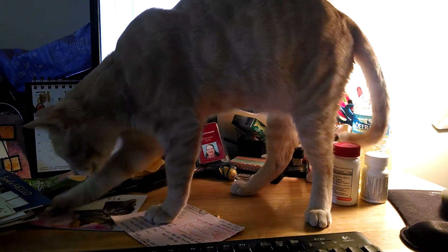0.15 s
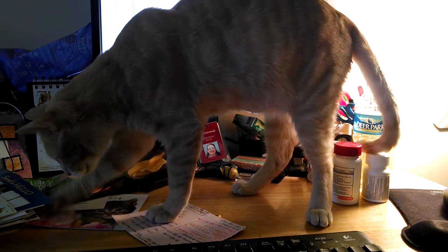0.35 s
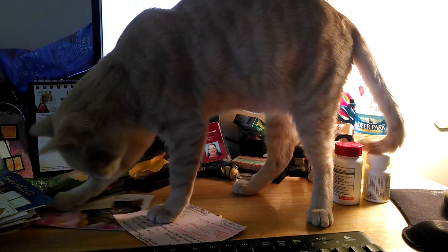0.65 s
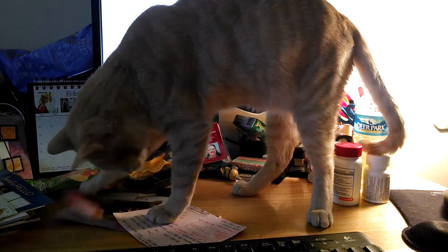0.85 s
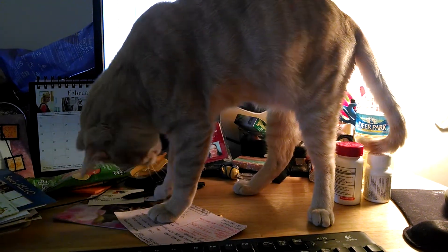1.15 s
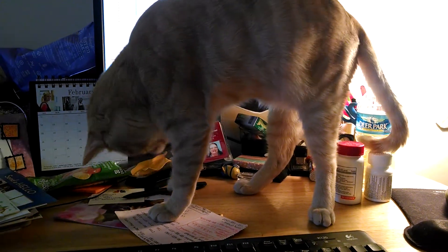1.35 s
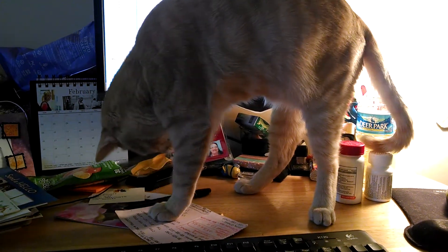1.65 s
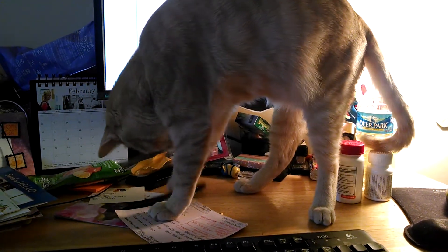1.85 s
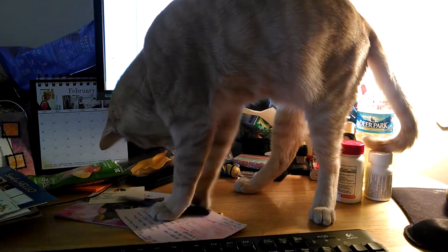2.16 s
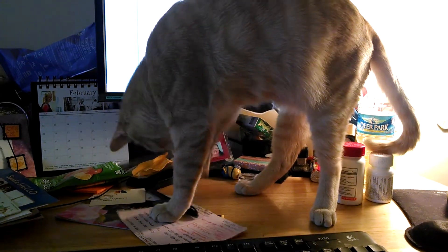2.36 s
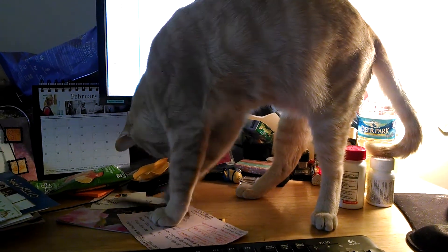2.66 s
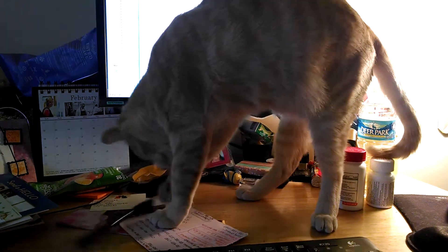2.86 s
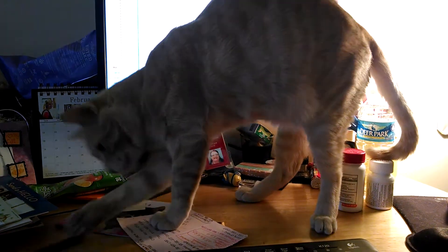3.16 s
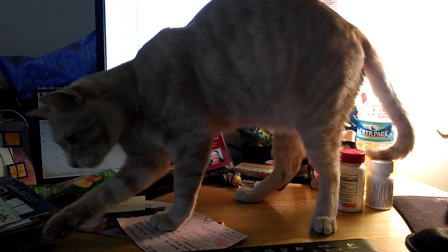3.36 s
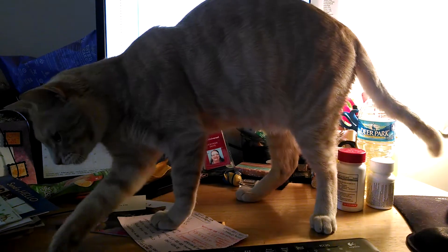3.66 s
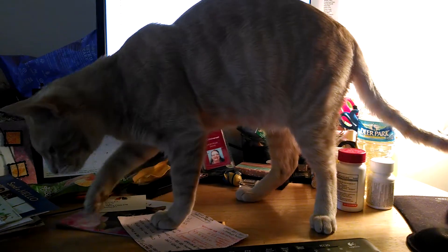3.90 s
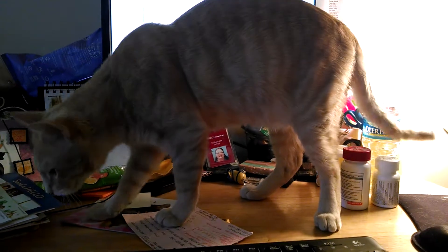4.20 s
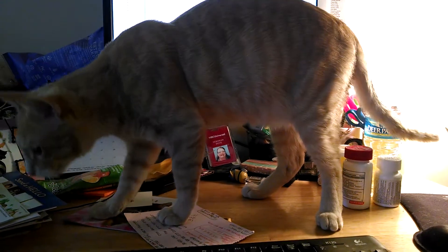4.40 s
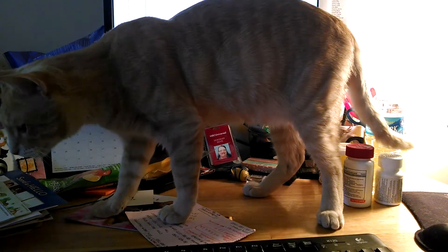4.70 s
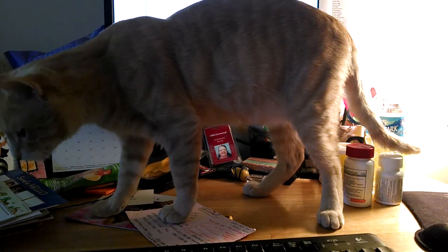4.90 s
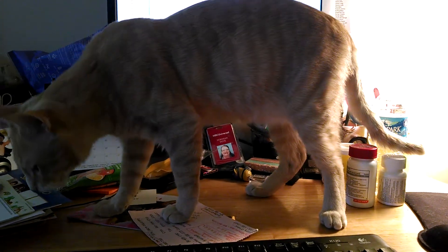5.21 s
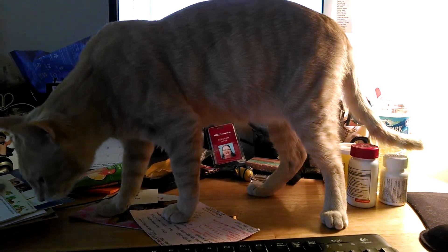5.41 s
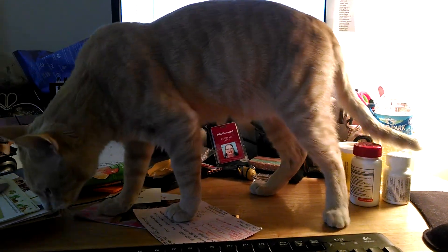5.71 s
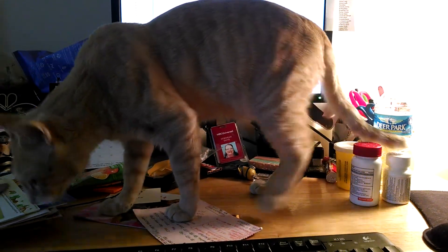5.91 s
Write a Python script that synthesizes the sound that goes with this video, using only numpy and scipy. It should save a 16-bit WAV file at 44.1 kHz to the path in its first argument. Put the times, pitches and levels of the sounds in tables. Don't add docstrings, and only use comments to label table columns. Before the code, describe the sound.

Dry, irregular paper clicks and short sliding scuffs come in clusters as a cat's paw works at sheets on a desk, with dull soft paw thumps beneath. The loudest crack comes about two and a half seconds in, briefly pushing the background down. After four seconds the paper almost stops, leaving a quiet steady fan hum, hiss and far traffic rumble in a small, lightly reverberant room, heard close in wide stereo.

```python
import sys
import numpy as np
from scipy import signal
from scipy.fft import rfft, irfft, next_fast_len
from scipy.io import wavfile
from scipy.ndimage import uniform_filter1d, map_coordinates

SR = 44100
rng = np.random.default_rng(int(sys.argv[2]) if len(sys.argv) > 2 else 0)


def undo_db(level):
    steps = np.asarray(level, float) / 20
    return 10 ** steps


def waveform_to_disk(signal):
    frames = np.transpose(np.atleast_2d(signal))
    scaled = np.clip(frames, -1, 1) * 32767
    samples = np.round(scaled).astype(np.int16)
    wavfile.write(sys.argv[1], SR, samples)


N = 266787

# start in seconds, peak in dB, desk knock in dB,
# sheet body in dB, crisp edge in dB.
SNAPS = [(0.7001, -21.5, -14, -10, -24.5), (0.9835, -14, -1.5, 5.5, -10), (0.9909, -22, -5, -9, -25),
         (1.0322, -19.5, -7, -2.5, -4.5), (1.0771, -13, -13.5, -7.5, -10.5), (1.5912, -29.5, -30, 22, -23),
         (1.7695, -28, -38, -9, -40), (2.0121, -13, -0.5, 0.5, -13.5), (2.0207, -14.5, -10, -18, -2),
         (2.0512, -24.5, -8, 3, -25), (2.124, -14, -17, -4, 34), (2.126, -21.5, 11, 19, -15),
         (2.2403, -9, -42, -13, 2), (2.4003, -16.5, -22, -12.5, -31), (2.4422, -4.5, -24, -23.5, -22.5),
         (2.45, -11.5, -22, -25, 13), (2.4737, -16.5, -11, -23, 6), (3.0008, -25.5, -18, -2.5, -21),
         (3.0898, -11.5, -24.5, -6, -33), (3.132, -23, -37, 0, -20), (3.1683, -10, 6.5, 11, 2.5),
         (3.245, -8.5, -29, -15.5, -15.5), (3.712, -9, -24.5, -7, -18.5)]
SNAP_DECAY_S, LONGER_DB_PER_DB_SOFTER = 0.0041, 0.66

# start in seconds, peak in dB, sheet body in dB, crisp edge in dB.
TICKS = [(0.5746, -31, -18, 11), (0.901, -30, -14, -14), (1.087, -24, -2, -3), (1.6178, -30, -27, -17),
         (1.922, -39, -7, -1), (2.1387, -24, -9, 24), (2.2646, -24, 2, 7), (2.2705, -21, -14, 8),
         (2.605, -34.5, -24, 2), (2.6845, -24, -18, 11), (2.6975, -26, -28, 0), (2.9222, -30.5, -17, -6),
         (4.1872, -35, -11, -9), (3.3406, -22, -3, -3), (3.3554, -32, -9, 9)]
TICK_DECAY_S, TICK_KNOCK_DB = 0.0094, -21

# start in seconds, peak in dB, sheet body in dB,
# crisp edge in dB.
CRUMPLES = [(0.2447, -44.5, -10, -2), (0.567, -37, -7, -22), (0.6152, -44.5, -7, -9),
            (0.7139, -23.5, -11, -15.5), (0.758, -33, 1, -5), (0.823, -30, 0, -26),
            (0.858, -36.5, -13, -12), (0.9088, -27, 0, -27), (0.9184, -27, -3, -17), (1.11, -32, 18, 6),
            (1.4243, -37, -27, -12), (1.5824, -24, -3, -7), (1.6564, -45, -16, -7),
            (1.7474, -38.5, 17, -24), (1.788, -39, -3, -21), (1.8134, -36, -1, -11),
            (2.0105, -23.5, -2, -22), (2.156, -30, -47, 28), (2.2563, -22.5, -28, 3),
            (2.3017, -31.5, -11, -11), (2.3453, -40, -13, -16), (2.65, -26, 2.5, 11.5),
            (2.7513, -36.5, 2, -13), (3.0457, -33.5, -13, -18), (3.1554, -25, -3, -19),
            (3.2143, -23, 0, -0.5), (5.9346, -43, -20, -24), (3.6361, -33, 25, -31), (3.7244, -29, -1, 5),
            (4.2087, -46, -3, -8)]
CRUMPLE_DECAY_S, CRUMPLE_KNOCK_DB = 0.033, -16

# start in seconds, length in seconds, sheet body in dB,
# desk over body in dB, edge over body in dB.
SKIDS = [(0.919, 0.13, -40.5, -11, -13), (1.0, 0.053, -36, -4, -6), (1.051, 0.023, -48.5, 10, -6),
         (1.086, 0.11, -36, -6.5, -16), (1.44, 0.049, -49, -8, -4), (1.597, 0.13, -46.5, -15, -6),
         (2.04, 0.062, -50, -2, -12), (2.138, 0.073, -40.5, 0, -6.5), (2.257, 0.07, -43.5, -4.5, 5.5),
         (2.346, 0.074, -49.5, -11, 0), (2.416, 0.028, -33, -9.5, -11), (2.457, 0.068, -44, 9.5, -5),
         (3.094, 0.067, -38, -11, -7), (3.181, 0.034, -34, 1, -12), (3.252, 0.08, -28, -10, -11),
         (3.351, 0.074, -37.5, -4.5, -20), (3.73, 0.14, -56.5, 11, -9)]
SKID_FALL_DB = 21

# start in seconds, length in seconds, sheet body in dB,
# mid treble over body in dB, edge over body in dB.
DRAGS = [(.675, 0.024, -55.5, 3, -2), (0.7, 0.11, -37, -11, -4.5), (0.786, 0.11, -36, -6.5, -8),
         (1.751, 0.11, -46, -2, -5.5), (1.905, 0.033, -62, 1, 3), (2.659, 0.059, -44, -2, 6),
         (2.752, 0.074, -41, -1, -7.5), (2.838, 0.039, -60, 4, 12), (3.01, 0.033, -57, 3, -12),
         (3.044, 0.039, -52.5, 7, 6), (3.218, 0.025, -34, 0.5, -26), (3.617, 0.092, -37.5, -21.5, -21),
         (3.677, 0.055, -46.5, -3, -24)]
DRAG_ENDS_DB, DRAG_FASTEST_SHARE, DRAG_DESK_DB = 19.5, 0.42, -11.5
CRACK_DB, CRACK_PER_EDGE_DB = -0.5, 0.41

# time in seconds, right microphone lag in ms, treble left-right in dB.
PAW = [(0, 0.099, -6), (.8, 0.036, -6), (.9, 0.1, -12.5), (1.1, 0.05, -3.5), (1.6, 0.0054, -4.5),
       (2, 0.004, -8.5), (2.3, 0.018, -9.5), (2.7, 0, -4.5), (2.95, 0.17, -3.5), (3.7, 0.27, -4),
       (6, 0.12, -2)]

# frequency in Hz, level in dB per Hz.
SHEET = [(100, -12), (250, -0.5), (700, -3), (1500, -0.5), (2700, 1.5), (3300, -5), (4200, -7.5),
         (5500, -6.5), (7500, -2.5), (9500, -4.5), (12000, -6.5), (15000, -9.5), (16000, -45), (17000, -85)]

# low edge in Hz, high edge in Hz.
BANDS = [(150, 850), (850, 2400), (2400, 5800), (5800, 17000)]

# centre in Hz, width in Hz, level in dB.
DESK = [(365, 140, 0), (932, 30, -6), (1484, 15, 3.5)]

# centre in Hz, width in Hz, level in dB.
PILE = [(1404, 630, -3.5), (3930, 1100, -8)]

# centre in Hz, width in Hz, depth from 0 to 1.
SOFT_DIP = (2530, 410, 0.39)

# frequency in Hz, T60 in seconds.
ROOM = [(300, 0.13), (1500, 0.22), (4000, 0.26), (10000, 0.26)]
ROOM_SOFT_HZ = 6100
MIC_SPACING_M = 0.1

# start in seconds, peak in dB, desk ring in Hz, push in dB.
THUDS = [
    (1.03, -35, 132, -13),
    (2.004, -42, 247, -5),
    (2.126, -32, 136, -20),
    (2.238, -42.5, 132, -14),
    (2.437, -34, 211, -14.5),
    (3.169, -42, 147, -10),
    (5.79, -45.5, 129, -12),
]

SHAFT_HZ = 74.88
FAN_ORDERS = [7, 9, 10, 13, 14, 21, 23, 27, 29, 31, 33, 44, 47]

# level in dB, left-right in dB.
FAN_LEVELS = [(-55.5, 4), (-76.5, 8), (-79, 8), (-97, 8), (-82, 13), (-83, -6), (-86, -10), (-109, 2),
              (-99, 14), (-88.5, -6), (-89, 20), (-83, -3), (-84, -6)]

# frequency in Hz, level in dB, left-right in dB.
MAINS = [(121.4, -62.5, -7.5), (365.4, -67, 2.5)]

# frequency in Hz, level in dB per Hz.
AIR_MID = [(50, -2), (120, 4.5), (175, -3.5), (240, 2.5), (480, -8), (700, -15), (1050, -14.5), (1400, -21),
           (2400, -23.5), (3500, -22), (5500, -28.5), (9000, -27.5), (13000, -30), (15500, -31.5)]

# frequency in Hz, level in dB per Hz.
AIR_SIDE = [(50, -3), (120, -12.5), (230, -10.5), (400, -13), (600, -18.5), (1050, -16), (1400, -19),
            (2400, -19.5), (3500, -24.5), (5500, -25.5), (9000, -28.5), (13000, -29), (15500, -33)]

# frequency in Hz, left-right in dB.
AIR_LEAN = [(60, 5), (240, 3), (950, 1), (3770, 1.5), (15000, -4.5)]

# centre in Hz, width in Hz, level in dB.
WHISTLE = (5270, 210, 2.7)
HISS_TOP_HZ, HISS_SWELL_DB = 15650, 0.8

# time in seconds, level in dB.
RUMBLE = [(0.0, -57), (0.15, -57.5), (0.32, -68.5), (1.11, -59.5), (1.38, -69), (2.12, -63.5),
          (2.42, -67.5), (3.66, -72), (4.06, -58.5), (4.85, -63), (5.11, -60.5), (5.26, -66.5), (6.05, -54)]

# start in seconds, gain drop in dB.
DUCKS = [
    (2.444, -9.5),
    (3.25, -2.5),
]
CROSS_DELAY_MS = 0.3756


def unit(x):
    return x / np.sqrt(np.mean(x ** 2) + 1e-20)


def along(points, hz):
    f, v = np.transpose(points)
    return np.interp(np.log(hz + 1), np.log(f + 1), v)


def curves(rows):
    s, *cols = np.transpose(rows)
    return [np.interp(np.arange(N) / SR, s, c) for c in cols]


def wobble(rate_hz):
    knots = rng.standard_normal(int(N * rate_hz / SR) + 4)
    return map_coordinates(knots, [np.arange(N) * rate_hz / SR])


def filtered(x, response):
    m = next_fast_len(x.shape[-1] + 4096)
    return irfft(rfft(x, m) * response(np.fft.rfftfreq(m, 1 / SR)), m)[..., :x.shape[-1]]


def causal(gain):
    cepstrum = irfft(np.log(gain + 1e-6))
    half = cepstrum.shape[-1] // 2
    fold = np.r_[1, 2 * np.ones(half - 1), 1, np.zeros(cepstrum.shape[-1] - half - 1)]
    return np.exp(rfft(cepstrum * fold))


def resonance(hz, centre_hz, width_hz):
    return 1 / (1 + (2 * (hz - centre_hz) / width_hz) ** 2)


def contacts():
    rows = [(*row, SNAP_DECAY_S * undo_db(-LONGER_DB_PER_DB_SOFTER * row[1])) for row in SNAPS]
    rows += [(s, db, TICK_KNOCK_DB, body, edge, TICK_DECAY_S) for s, db, body, edge in TICKS]
    rows += [(s, db, CRUMPLE_KNOCK_DB, body, edge, CRUMPLE_DECAY_S) for s, db, body, edge in CRUMPLES]
    return rows


def band_gains(hz):
    low_hz, high_hz = np.transpose(BANDS)[:, :, None]
    rings = 1 + sum(undo_db(db + 3.5) * resonance(hz, c, w) for c, w, db in DESK + PILE)
    band = 1 / np.sqrt((1 + (low_hz / (hz + 1)) ** 8) * (1 + (hz / high_hz) ** 8))
    gain = rings * undo_db(along(SHEET, hz)) * band
    return gain / np.sqrt(np.mean(gain ** 2, axis=1, keepdims=True))


def dipped(hz):
    centre_hz, width_hz, depth = SOFT_DIP
    return 1 - np.clip(depth, 0, .95) * resonance(hz, centre_hz, width_hz)


def diffuse(pair):
    def mid_side(hz):
        angle = np.arccos(np.sinc(2 * hz * MIC_SPACING_M / 343)) / 2
        return np.array([np.cos(angle), np.sin(angle)])

    mid, side = filtered(pair, mid_side)
    return np.array([mid + side, mid - side])


def snaps():
    size = 8192
    out = np.zeros((2, N + size))
    t, hz = np.arange(size) / SR, np.fft.rfftfreq(size, 1 / SR)
    bands = band_gains(hz)
    frame_hz, frame_t, _ = signal.stft(t, SR, nperseg=256)
    fading = undo_db(-60 * frame_t / along(ROOM, frame_hz)[:, None])
    lag_ms, lean_db = curves(PAW)
    for s, peak_db, knock_db, body_db, edge_db, t60_s in contacts():
        at = round((s + .0008) * SR)
        shared, *own = rng.standard_normal((3, size))
        lumps = undo_db(2.96 * np.repeat(rng.standard_normal(size // 16), 16))
        decay = undo_db(-60 * t / np.clip(t60_s, .003, .04))
        burst = lumps * decay * (1 - np.exp(-t / 0.000079))
        direct = shared * burst
        pair = rfft(direct) + 2.4 * rfft(np.array(own) * burst) * hz / (hz + 4000)

        noise = signal.stft(rng.standard_normal((2, size)), nperseg=256)[2]
        tail = diffuse(signal.istft(noise * fading, nperseg=256)[1][:, :size])
        tail *= 1 - np.exp(-t / 0.00061)
        tail *= undo_db(-3.5) * np.linalg.norm(direct) / np.linalg.norm(tail[0])
        late = rfft(tail) * dipped(hz) / (1 + hz / ROOM_SOFT_HZ)

        ripple_db = np.interp(np.log(hz + 1), np.linspace(5, 10, 40), rng.normal(0, 2.5, 40))
        levels_db = np.array([knock_db + 2.5, body_db - 1.0, -5, edge_db + 4.0])
        given = uniform_filter1d(np.sum(np.abs(pair) ** 2, axis=0), size=220)
        colour = causal(undo_db(ripple_db) * np.sqrt(undo_db(2 * levels_db) @ bands ** 2 / given))
        treble = hz ** 2 / (hz ** 2 + 5000 ** 2)
        lean = undo_db(np.outer([.5, -.5], lean_db[at] * treble))
        lag = np.exp(-2j * np.pi * np.outer([0, 1e-3], hz) * lag_ms[at])
        sound = irfft((pair * lag + late) * colour * lean)
        out[:, at:at + size] += undo_db(peak_db + 2.0) * sound / np.abs(sound).max()
    return out[:, :N]


def skid_db(u):
    return -SKID_FALL_DB * u


def drag_db(u):
    return -DRAG_ENDS_DB * (2 * (u - DRAG_FASTEST_SHARE)) ** 2


def slides():
    out = np.zeros((2, N))
    clumps_db = np.clip(rng.exponential(1, N // 24 + 1), 0, 4)
    catches = undo_db(2.3 * np.repeat(clumps_db, 24)[:N])
    grit = rng.standard_normal((2, N)) * catches * undo_db(1.2 * wobble(45) + 1.84 * wobble(160))
    coloured = filtered(diffuse(grit)[None], lambda hz: (band_gains(hz) * dipped(hz))[:, None])
    layers = [unit(x) for x in coloured]
    layers[-1] = layers[-1] * undo_db(np.outer([.6, -.6], curves(PAW)[1]))

    strokes = []
    for s, length_s, body_db, desk, edge in SKIDS:
        crack = CRACK_DB + CRACK_PER_EDGE_DB * edge
        strokes.append((s, length_s, body_db, [desk, 0, crack, edge], skid_db))
    for s, length_s, body_db, crack, edge in DRAGS:
        strokes.append((s, length_s, body_db, [DRAG_DESK_DB, 0, crack, edge], drag_db))

    for s, length_s, body_db, colour_db, shape in strokes:
        a, b = round((s - .008) * SR), round((s + length_s + .012) * SR)
        speed_db = body_db + shape(np.linspace(0, 1, b - a))
        fade = signal.windows.tukey(b - a, min(1, 300 / (b - a)))
        for db, trim_db, x in zip(colour_db, [0.5, -8.5, -6.0, -4.0], layers):
            out[:, a:b] += fade * undo_db(speed_db + db + trim_db) * x[:, a:b]
    return out


def thuds():
    out, t = np.zeros(N + SR), np.arange(SR // 4) / SR
    for s, db, hz, push_db in THUDS:
        ring = (1 - np.exp(-t / 0.0069)) * undo_db(-60 * t / 0.093) * np.sin(2 * np.pi * hz * t)
        push = undo_db(push_db) * np.sin(2 * np.pi * np.clip(t / 0.0144, 0, 1))
        out[round(s * SR):][:len(t)] += undo_db(db + 9.5) * (ring + push)
    return out[:N] * undo_db([[.8], [-.8]])


def fan():
    turns = np.cumsum(SHAFT_HZ * (1 + 0.000427 * wobble(2.94))) / SR
    tones = [(k * turns, db, lean_db) for k, (db, lean_db) in zip(FAN_ORDERS, FAN_LEVELS)]
    tones += [(hz * np.arange(N) / SR, db, lean_db) for hz, db, lean_db in MAINS]
    out = np.zeros((2, N))
    for cycles, db, lean_db in tones:
        phase = rng.uniform(0, 1)
        level_db = db + 2 + 1.06 * wobble(8.3) + np.array([[.5], [-.5]]) * lean_db
        out += undo_db(level_db) * np.sin(2 * np.pi * (cycles + phase))
    return out


def air():
    a, b, c, d = rng.standard_normal((4, N))
    whistle_hz, width_hz, whistle_db = WHISTLE
    a = filtered(a, lambda hz: 1 + undo_db(whistle_db) * resonance(hz, whistle_hz, width_hz))

    def hiss_colour(hz):
        return undo_db([along(AIR_MID, hz), along(AIR_SIDE, hz)]) * (hz > 50) * (hz < HISS_TOP_HZ)

    mid, side = filtered(np.array([a, b]), hiss_colour)
    pair = np.array([mid + side, mid - side])
    hiss = filtered(pair, lambda hz: undo_db(np.outer([.5, -.5], along(AIR_LEAN, hz))))
    far = np.array([c + .15 * d, c - .08 * d])
    rumble = unit(filtered(far, lambda hz: (hz > 18) / (1 + (hz / 48) ** 4)))
    hiss_gain = undo_db(-52.0 + HISS_SWELL_DB * wobble(2.47))
    return hiss_gain * unit(hiss) + undo_db(curves(RUMBLE)[0] + 11) * rumble


def scene():
    return snaps() + slides() + thuds() + fan() + air()


def low_pass(x):
    return signal.sosfilt(signal.butter(12, 16640, fs=SR, output="sos"), x)


def record(dry):
    def cross(hz):
        delay = np.exp(-2j * np.pi * hz * CROSS_DELAY_MS / 1000)
        return (.17 + .52 / (1 + (hz / 4600) ** 4)) * delay

    wide = dry - filtered(dry[::-1], cross)
    t = np.arange(N) / SR
    gain_db = np.zeros(N)
    for s, drop_db in DUCKS:
        since_s = np.abs(t - s)
        gain_db += drop_db * (t > s) * (1 - np.exp(-since_s / 0.0086)) * np.exp(-since_s / 0.3)
    return low_pass(wide * undo_db(gain_db))


dry = scene()
out = record(dry)
waveform_to_disk(out)
```